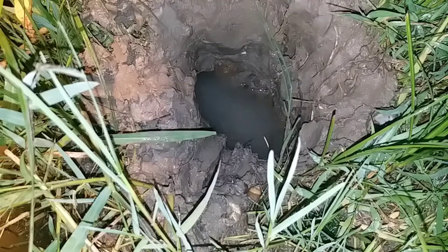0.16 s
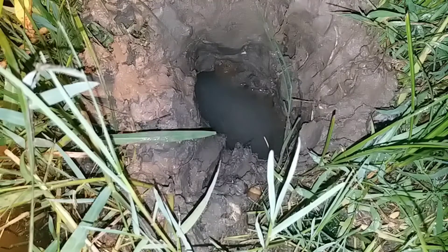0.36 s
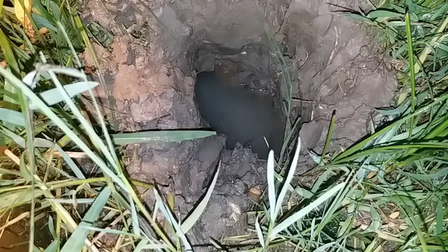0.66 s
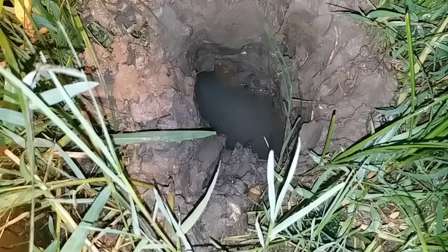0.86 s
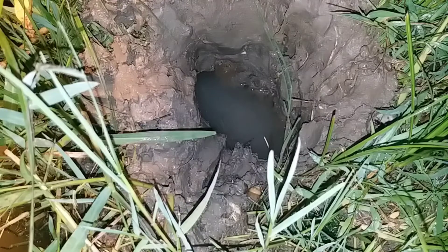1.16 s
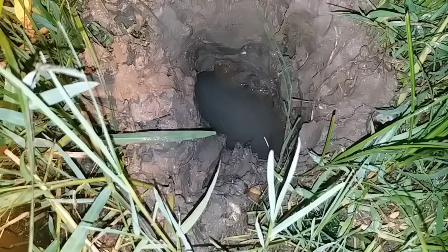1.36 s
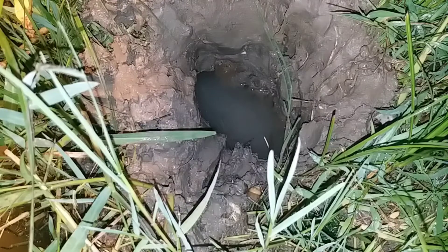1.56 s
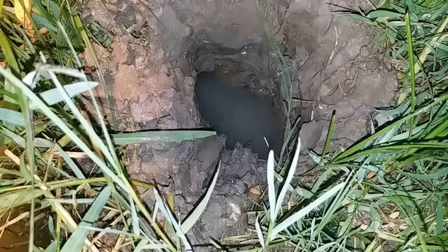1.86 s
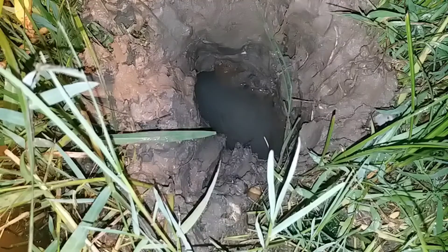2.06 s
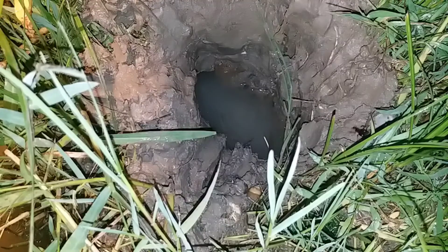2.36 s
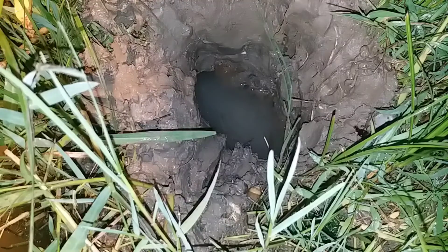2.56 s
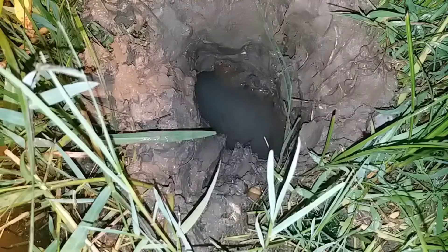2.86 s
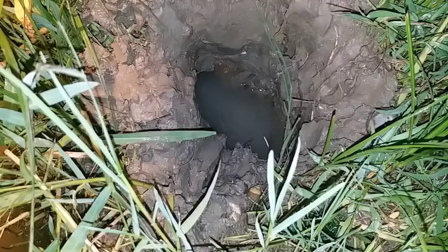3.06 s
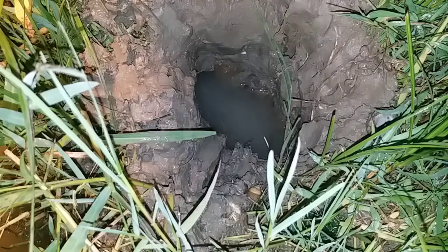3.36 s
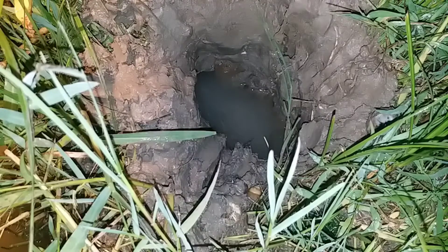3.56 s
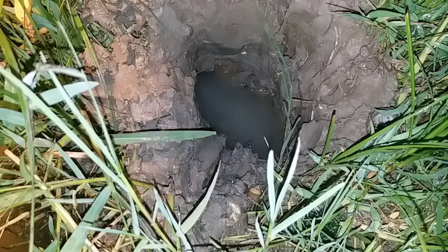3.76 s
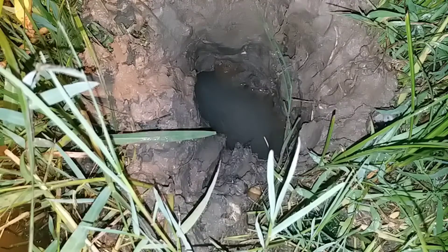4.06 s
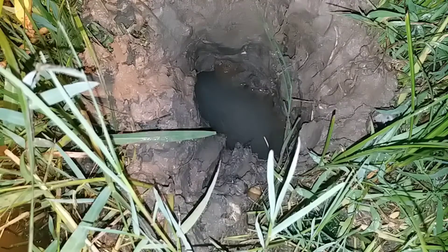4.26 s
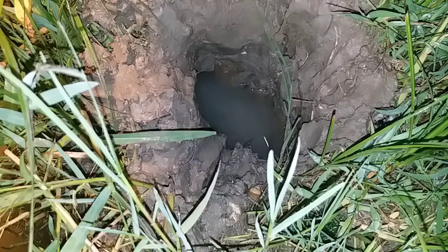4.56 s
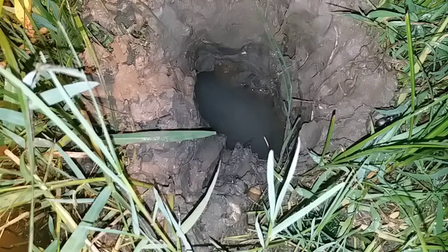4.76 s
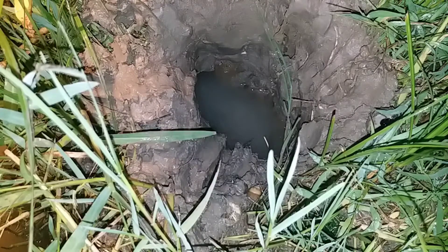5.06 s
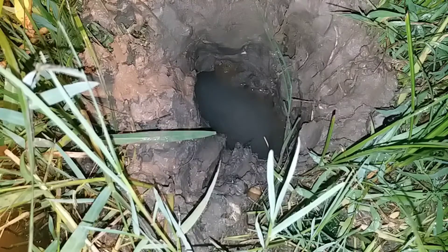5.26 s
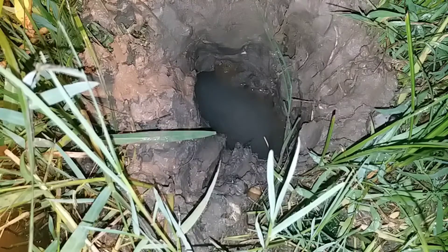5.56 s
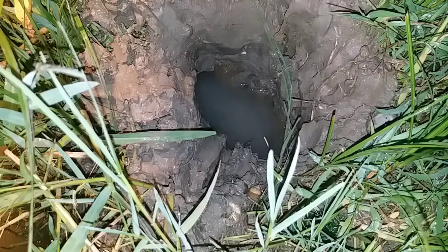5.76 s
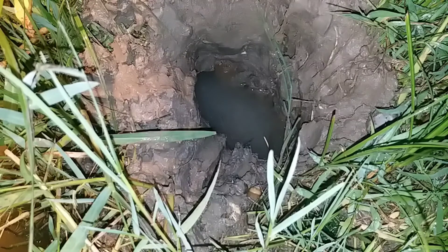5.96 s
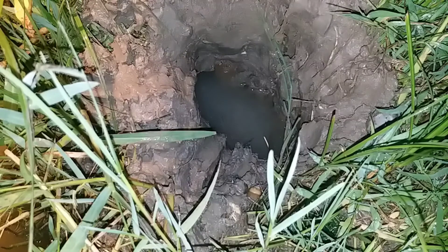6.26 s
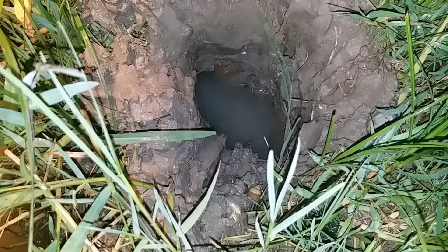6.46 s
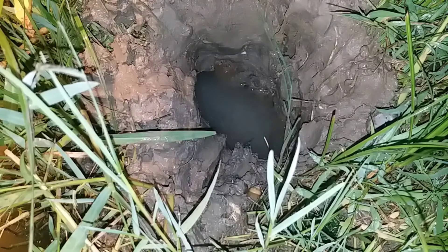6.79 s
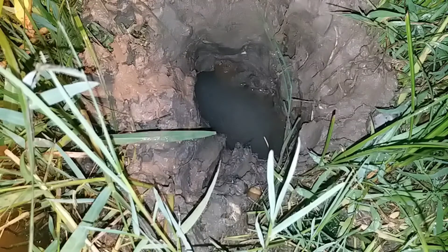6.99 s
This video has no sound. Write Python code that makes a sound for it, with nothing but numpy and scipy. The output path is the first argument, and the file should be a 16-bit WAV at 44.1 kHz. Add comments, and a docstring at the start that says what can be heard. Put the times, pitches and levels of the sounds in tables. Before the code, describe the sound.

Outdoor stereo night ambience, with the microphone close to a wet mud burrow. Steady high insect song fills the air: rapid chirps, lower trills in bouts, fine buzzes and a few rasps. Beneath it a far motorbike throbs, slows and disappears, leaving dull distant traffic rumble. After two tiny dry ticks and faint bubbles in the second half, the last sound is a sharp watery pop like the earlier one, short, resonant and crackling.

```python
"""Crickets chirp and trill in falling syllables over a far motorbike, at night on a marshy bank.
The bike, pulses through an exhaust, slows and fades into a low rumble of shaped noise.
Mole crickets churr (a tone and a noise band) and katydids buzz above (noise bands beaten by wing strokes).
Grass brushes briefly and stems tick: noise bursts. Close by, bubbles pop in a wet mud burrow, twice
sharply: decaying sines and a crackle."""
import sys
import numpy as np
from scipy import signal
from scipy.fft import rfft, irfft, next_fast_len
from scipy.io import wavfile
from scipy.ndimage import map_coordinates

SR = 44100
rng = np.random.default_rng(int(sys.argv[2]) if len(sys.argv) > 2 else 0)


def output_pcm(signal):
    """Save a mono or channel-first signal as 16-bit PCM at the path in sys.argv[1].

    Samples are clipped to [-1, 1] before scaling.
    """
    pcm = np.clip(np.atleast_2d(signal).T, -1, 1) * 32767
    wavfile.write(sys.argv[1], SR, np.round(pcm).astype(np.int16))


N = 314433
TIME = np.arange(N) / SR
TOP_HZ = 15780

# Table levels are relative: sources apply further gains.
# left-right correlation of noise and scatter: f/Hz, correlation
CORRELATION = [(110, 1), (200, .99999), (380, 0.98), (700, 0.93), (1290, 0.99), (2300, 1), (3700, 0.91),
               (5700, 0.85), (7000, 1), (8500, 0.72), (9800, 0.89), (11000, 0.96)]
# near cricket phrases, singles then pairs: start/s, first pair/s, pair rate/Hz, level/dB
CHIRP_PHRASES = [(0, .181, 8.97, -57), (.957, 1.183, 9.15, -57.5), (1.972, 2.192, 8.93, -55.5),
                 (3.1, 3.386, 8.85, -56), (3.957, 4.185, 8.85, -58), (4.985, 5.163, 8.85, -58.5),
                 (5.91, 6.083, 9.1, -58), (6.9, 7.068, 9, -57.5)]
SINGLES_PER_S, PAIR_GAP_S, SYLLABLE_SCATTER_DB = 17.5, 0.033, 1
# distant rumble level: t/s, level/dB
RUMBLE_LEVEL = [(0, -47.5), (1.8, -48.5), (3.3, -46), (4.4, -47.5), (7.13, -46.5)]
# distant rumble spectrum: f/Hz, density/(dB per Hz)
RUMBLE_SPECTRUM = [(15, -31), (24, -22), (37, -26), (50, -2), (76, -5), (98, -2.5), (144, -2), (173, -5),
                   (259, -14), (340, -20.5), (420, -26.5), (525, -34), (800, -50.5), (1760, -120)]
# throbs in the rumble: centre t/s, level/dB
RUMBLE_THROBS = [(2.78, -42.5), (3.1, -43.5), (3.43, -43.5), (3.6, -44), (3.86, -44.5), (4.13, -44.5),
                 (6.05, -43)]
THROB_HZ, THROB_WIDTH_HZ, THROB_S = 102.4, 10.4, 0.075
# far chorus and hiss spectrum: f/Hz, density/(dB per Hz)
CHORUS_SPECTRUM = [(400, -6), (1800, -10.5), (2800, -7), (3300, -7.5), (3800, 3.5), (4400, -13), (5200, -4),
                   (5750, 8), (6350, -5), (7600, 0), (9500, -23), (10300, -15), (14000, -10.5), (15500, -6)]
# steady katydids: pitch f/Hz, bandwidth/Hz, wing stroke rate/Hz, level/dB
STEADY_KATYDIDS = [(7830, 374, 164, -63.5), (8640, 62, 118, -65.5), (9290, 303, 120, -64)]
# grass brush spectrum: f/Hz, level/dB
BRUSH_SPECTRUM = [(400, 9), (1400, -3.5), (2000, -8), (2600, 5), (3400, -8), (9000, -10)]
# dry stem ticks: t/s, level/dB
STEM_TICKS = [(4.818, -49), (6.321, -44)]
# stem tick spectrum: f/Hz, level/dB
STEM_SPECTRUM = [(1500, -25), (3800, -13), (6000, -13), (8300, 11), (9500, -11), (12000, -25)]
# motorbike: t/s, firing rate/Hz, level/dB
BIKE_COURSE = [(0, 43.3, -55), (.26, 44.4, -47.5), (.34, 42, -37), (.44, 41, -37), (.72, 36.3, -49),
               (1.2, 41.4, -44.5), (1.6, 39.8, -41), (2.25, 37, -42.5), (2.65, 34, -47), (3.1, 29.5, -66),
               (7.13, 30, -87)]
# exhaust spectrum: f/Hz, level/dB
EXHAUST_SPECTRUM = [(25, -25), (50, -3.5), (80, -1), (110, 2), (200, 1), (265, -27.5), (350, -16),
                    (420, -34.5), (600, -46), (1000, -72)]
# bark spectrum, open throttle: f/Hz, level/dB
BARK_SPECTRUM = [(100, -57), (210, 5.5), (300, -11), (400, -5), (500, -14), (650, -38), (1200, -61)]
# throttle bursts: start/s, end/s, bark level/dB
THROTTLE_BURSTS = [(0, .3, -48.5), (0.748, 1.24, -62.5)]
THROTTLE_RAMP_S, COAST_BARK_DB = 0.066, -23
# lower cricket trills: start/s, end/s, syllable rate/Hz, level/dB
TRILL_BOUTS = [(.02, .44, 21, -60.5), (.455, .8, 22.2, -56.5), (.835, 1.25, 22, -57.5),
               (1.447, 2.4, 22.5, -58.5), (2.627, 3.6, 22.9, -59.5), (5.782, 6.7, 22.3, -58)]
TRILL_RISE_S, TRILL_FALL_S, TRILL_FADE_DB = 0.084, 0.45, 6
# neighbour's unbroken trill: t/s, level/dB
NEIGHBOUR_LEVEL = [(0, -66.5), (1.3, -70), (2.1, -59.5), (2.55, -76), (3.6, -63), (4.8, -62.5), (5.1, -72),
                   (5.6, -64), (7.13, -65)]
# runs of short swells of a high noise band: start/s, end/s, level/dB
HIGH_BAND_SWELL_RUNS = [(0.039, .42, -58), (3.894, 5.2, -58), (5.685, 6.9, -55.5)]
SWELLS_PER_S, SWELL_S = 8.5, 0.018
# katydid rasps: start/s, end/s, pitch f/Hz, level/dB
KATYDID_RASPS = [(0.581, 0.831, 7340, -56.5), (0.983, 1.2, 7375, -55.5), (1.796, 1.89, 8500, -56.5)]
# pops: t/s, bubble f/Hz, level/dB, gulp f/Hz, gulp level/dB, crackle level/dB, length/s
BUBBLE_POPS = [(3.6401, 870, -22.5, 526, -21, -32, 0.0065), (5.324, 1050, -61, 507, -75, -74, 0.016),
               (5.558, 2780, -52.5, 500, -78, -66, 0.004), (6.9631, 885, -18.3, 450, -24.5, -28.5, 0.0081)]
# burrow air modes: f/Hz, level/dB, t60/s
BURROW_MODES = [(325.5, -35, 0.025), (458, -7.5, 0.048), (985, -18, 0.017), (1400, -31, 0.0083),
                (1740, -37, 0.017)]
# pop crackle response: f/Hz, gain/dB
CRACKLE_RESPONSE = [(300, -5), (1200, 1), (1700, -7.5), (2500, -26), (3800, -13.5), (4700, -23.5),
                    (5450, 4), (6700, -4), (7750, 4), (8900, -0.5), (10200, -15), (15500, -5)]
# left-right correlation of the pop crackle: f/Hz, correlation
CRACKLE_CORRELATION = [(300, .99), (1200, 0.97), (2500, 1), (4500, 0.76), (5500, 0.95), (9500, .99),
                       (11000, .8), (14000, .1)]
# scatter off the mud: f/Hz, gain/dB
BANK_RESPONSE = [(300, -12), (800, -2.5), (1500, -5.5), (3000, -15.5), (9000, -7), (15000, -22)]


def amp(db):
    """Decibels to amplitude."""
    return 10 ** (np.asarray(db) / 20)


def unit(x):
    """Scale to unit RMS."""
    return x / np.sqrt(np.mean(x ** 2) + 1e-20)


def along(points, hz):
    """Interpolate (f/Hz, value) points on a log frequency axis."""
    f, value = np.transpose(points)
    return np.interp(np.log(hz + 1), np.log(f + 1), value)


def curves(rows):
    """One value per sample for each column after the time."""
    s, *columns = np.transpose(rows)
    return [np.interp(TIME, s, column) for column in columns]


def wobble(knots_per_s):
    """Smooth random curve through normally distributed knots."""
    knots = rng.standard_normal(int(N * knots_per_s / SR) + 4)
    return map_coordinates(knots, [TIME * knots_per_s])


def filtered(x, response):
    """Apply a frequency response by FFT."""
    m = next_fast_len(N + SR // 2)
    return irfft(rfft(x, m) * response(np.fft.rfftfreq(m, 1 / SR)), m)[..., :N]


def coloured(x, spectrum):
    """Filter through (f/Hz, gain/dB) points."""
    return filtered(x, lambda hz: amp(along(spectrum, hz)))


def spread(pair, correlation=CORRELATION):
    """Mix two unrelated signals into left and right with a set correlation at each frequency."""
    def mid_side_gains(hz):
        angle = np.arccos(np.clip(along(correlation, hz), -1, 1)) / 2
        return np.array([np.cos(angle), np.sin(angle)])

    mid, side = filtered(pair, mid_side_gains)
    return np.array([mid + side, mid - side])


def noise(correlation=CORRELATION):
    """Stereo white noise."""
    return spread(rng.standard_normal((2, N)), correlation)


def beats(rate_hz):
    """Times at which a running rate completes a cycle."""
    cycles = np.cumsum(rate_hz) / SR + rng.random()
    return TIME[1:][np.diff(np.floor(cycles)) > 0]


def gate(start, end, ramp_s):
    """One between start and end, with sloping edges."""
    return np.clip(np.minimum(TIME - start, end - TIME) / ramp_s + .5, 0, 1)


def add(track, s, sound):
    """Mix a sound into a track at time s."""
    start = round(s * SR)
    lo, hi = max(start, 0), min(start + len(sound), N)
    if hi > lo:
        track[lo:hi] += sound[lo - start:hi - start]


def reeds(x, wet_db, t60_s):
    """Direct sound plus its scatter among the stems, a decaying noise tail."""
    t = TIME[:SR // 3]
    tail = rng.standard_normal((2, len(t))) * amp(-60 * t / t60_s)
    scatter = spread(signal.fftconvolve(x[None], tail, axes=1)[:, :N])
    return x + amp(wet_db) * np.std(x) * unit(scatter)


def syllables(times, levels_db, pitch_hz, fall, length_s, scatter):
    """One wing closure each: a tone that swells and dies, sinking in pitch as the wing slows."""
    # fall and scatter are fractions of the pitch
    track, u = np.zeros(N), np.linspace(-.5, .5, int(length_s * SR))
    swell = np.cos(np.pi * u) ** 2
    for s, db, (detune, phase) in zip(times, levels_db, rng.standard_normal((len(times), 2))):
        hz = pitch_hz * (1 + scatter * detune - fall * u)
        tone = np.sin(2 * np.pi * (np.cumsum(hz) / SR + phase))
        add(track, s - length_s / 2, amp(db) * swell * tone)
    return track


def buzz(pitch_hz, width_hz, strokes_hz, depth):
    """A noise band beaten by fast, slightly unsteady strokes."""
    band = filtered(noise(), lambda hz: np.exp(-((hz - pitch_hz) / width_hz) ** 2 / 4))
    cycles = np.cumsum(strokes_hz * (1 + 0.00854 * wobble(3.016))) / SR
    return unit(band * (1 + depth * np.sin(2 * np.pi * cycles)))


def phrase(start, first_pair, end, pairs_per_s):
    """Syllable times: evenly spaced singles, then pairs until the phrase ends."""
    count = round((first_pair - start) * SINGLES_PER_S)
    singles = np.linspace(start, first_pair, count, endpoint=False)
    pairs = np.arange(first_pair, end - PAIR_GAP_S, 1 / pairs_per_s)
    return np.concatenate([singles, pairs, pairs + PAIR_GAP_S])


def chirping_crickets():
    """Falling wing tones: a near cricket sings in phrases; a higher neighbour runs on behind it."""
    ends = [row[0] for row in CHIRP_PHRASES[1:]] + [N / SR]
    events = []
    for (start, first_pair, rate, db), end in zip(CHIRP_PHRASES, ends):
        events += [(s, db) for s in phrase(start, first_pair, end, rate)]
    s, db = np.transpose(events)
    levels_db = rng.normal(db + 0.55, SYLLABLE_SCATTER_DB)
    near = syllables(s, levels_db, pitch_hz=5662, fall=0.151, length_s=0.039, scatter=0.005)
    s = beats(36.5 + 1.5 * wobble(4.7))
    levels_db = rng.normal(-63, 0.85, len(s))
    far = syllables(s, levels_db, pitch_hz=5920, fall=0.1217, length_s=.03, scatter=0.00975)
    return reeds(near, wet_db=-6, t60_s=.15) + reeds(far, wet_db=-2, t60_s=.2)


def background():
    """Far traffic rumbles and throbs under a distant chorus, all as shaped noise."""
    level_db, = curves(RUMBLE_LEVEL)
    waver_db = 1.1 * wobble(9)
    rumble = amp(level_db + 1 + waver_db) * unit(coloured(noise(), RUMBLE_SPECTRUM))
    swells = sum(amp(db) * np.exp(-((TIME - s) / THROB_S) ** 2) for s, db in RUMBLE_THROBS)
    band = filtered(noise(), lambda hz: np.exp(-((hz - THROB_HZ) / THROB_WIDTH_HZ) ** 2 / 4))
    chorus = amp(-59.5) * unit(coloured(noise(), CHORUS_SPECTRUM))
    return rumble + swells * unit(band) + chorus


def mole_cricket():
    """One holds a pure tone beaten by wing strokes; others smear into a band around it."""
    strokes = 1 + .5 * np.sin(2 * np.pi * np.cumsum(100.0 + 0.72 * wobble(2.6)) / SR)
    note = np.sin(2 * np.pi * np.cumsum(2286 + 9 * wobble(25)) / SR)
    swell_db = 1.5 * wobble(6) + 2 * wobble(30)
    others = amp(-69.5 + 1.8 * wobble(9.1)) * buzz(2301, 97, 129.5, depth=0.24)
    return amp(-72.0 + swell_db) * strokes * note + others


def steady_katydids():
    """Wing resonances scraped by fast strokes; they swell a little and flutter fast."""
    total = 0
    for hz, width_hz, strokes_hz, db in STEADY_KATYDIDS:
        flutter_db = .8 * wobble(4) + 2.4 * wobble(35)
        total = total + amp(db + flutter_db) * buzz(hz, width_hz, strokes_hz, depth=0.29)
    return total


def grass():
    """A faint brush of grass dies away and dry stems tick: enveloped noise."""
    brush = amp(-59.0) * np.exp(-(TIME / 0.09) ** 2) * unit(coloured(noise(), BRUSH_SPECTRUM))
    snaps = sum(amp(db) * np.exp(-((TIME - s) / 0.0013) ** 2) for s, db in STEM_TICKS)
    return brush + snaps * unit(coloured(noise(), STEM_SPECTRUM))


def exhaust_and_echo(hz):
    """All-pass pipe that delays the bass most, and an echo from the land 9.75 ms later."""
    pipe = np.exp(-4j * np.pi * np.arctan(hz / 110))
    return pipe * (1 + 0.16 * np.exp(-2j * np.pi * hz * 0.00975))


def motorbike():
    """One pulse per firing through the exhaust; it barks while the throttle is open."""
    rate_hz, db = curves(BIKE_COURSE)
    s = beats(rate_hz * (1 + 0.007 * wobble(24.9)))
    firings = np.zeros(N)
    firings[(s * SR).astype(int)] = amp(rng.normal(0, 1.45, len(s)))
    firings = filtered(firings, exhaust_and_echo)
    throttle = amp(db + COAST_BARK_DB)
    for start, end, bark_db in THROTTLE_BURSTS:
        throttle = throttle + amp(bark_db) * gate(start, end, THROTTLE_RAMP_S)
    bark = throttle * amp(1.3 * wobble(40.8)) * unit(coloured(firings, BARK_SPECTRUM))
    return amp(db - 3.0) * unit(coloured(firings, EXHAUST_SPECTRUM)) + bark


def trill(start, end, rate_hz, db):
    """(t/s, level/dB) of even syllables: a quick swell in, a slow fade out."""
    s = np.arange(start, end, 1 / rate_hz)
    fade = np.clip(1 - np.minimum((s - start) / TRILL_RISE_S, (end - s) / TRILL_FALL_S), 0, 1)
    return np.array([s, db - TRILL_FADE_DB * fade])


def trilling_crickets():
    """Falling wing tones: a lower cricket trills in bouts against a neighbour that never stops."""
    s, db = np.hstack([trill(*row) for row in TRILL_BOUTS])
    levels_db = db + rng.normal(0.2, 1, len(s))
    lead = syllables(s, levels_db, pitch_hz=3577, fall=0.148, length_s=0.028, scatter=0.011)
    s = beats(21.0 + .8 * wobble(5))
    levels_db = np.interp(s, *np.transpose(NEIGHBOUR_LEVEL)) + rng.normal(0, 1.8, len(s))
    second = syllables(s, levels_db, pitch_hz=3928, fall=0.121, length_s=0.028, scatter=.012)
    return reeds(lead, wet_db=-3.5, t60_s=0.59) + reeds(second, wet_db=-1, t60_s=0.4)


def high_band_swells():
    """Short swells of a high noise band, loosely paced."""
    swells = 0
    for start, end, db in HIGH_BAND_SWELL_RUNS:
        for s in np.arange(start, end, 1 / SWELLS_PER_S):
            level = amp(db + rng.normal(0, 2.8))
            swells = swells + level * np.exp(-((TIME - s - rng.normal(0, 0.03)) / SWELL_S) ** 2)
    return swells * buzz(9350, 210, 130, depth=0.3)


def katydid_rasps():
    """Scraped wing resonances gated into a few long rasps."""
    rasps = 0
    for start, end, hz, db in KATYDID_RASPS:
        edges = np.clip(np.minimum(TIME - start, end - TIME) / 0.021, 0, 1)
        rasps = rasps + amp(db) * edges * buzz(hz, 170, 164, depth=0.43)
    return rasps


def pops():
    """A bubble swings and bursts in a crackle; the water closes with a gulp and the burrow rings."""
    ring, fizz, t = np.zeros(N), np.zeros(N), TIME[:SR // 8]
    onset = 1 - np.exp(-t / 0.0017)
    cavity = sum(amp(db - 60 * t / t60) * np.sin(2 * np.pi * hz * t) for hz, db, t60 in BURROW_MODES)
    for s, hz, db, gulp_hz, gulp_db, crackle_db, length_s in BUBBLE_POPS:
        swing = np.sin(np.pi * np.minimum(t / length_s, 1)) * np.sin(2 * np.pi * hz * t)
        gulp = amp(gulp_db - 60 * t / 0.034) * np.sin(2 * np.pi * gulp_hz * t)
        burst_s = s + length_s / 2
        add(ring, s, amp(db) * (swing + onset * cavity))
        add(ring, burst_s, onset * gulp)
        fizz += amp(crackle_db + 7) / (1 + ((TIME - burst_s) / (.5 * length_s)) ** 4)
    crackle = coloured(fizz * noise(CRACKLE_CORRELATION), CRACKLE_RESPONSE)
    # the bank scatters a faint, dull tail
    decay = amp(-60 * TIME / .22)
    echo = signal.fftconvolve(fizz, decay / decay.sum())[:N]
    return ring + crackle + echo * coloured(noise(), BANK_RESPONSE)


def scene():
    """Sum the sources; insects and high-band swells sit slightly to the right."""
    high_layers = chirping_crickets() + mole_cricket() + steady_katydids()
    high_layers = high_layers + trilling_crickets() + high_band_swells() + katydid_rasps()
    high_layers = high_layers * amp([[-.4], [.4]])
    return high_layers + background() + grass() + motorbike() + pops()


def record(dry):
    """Keep nothing at or above the band limit."""
    return filtered(dry, lambda hz: hz < TOP_HZ)


dry = scene()
out = record(dry)
output_pcm(out)
```